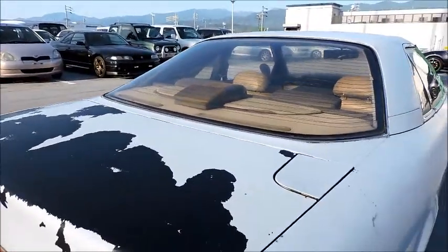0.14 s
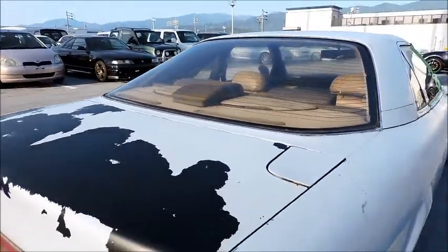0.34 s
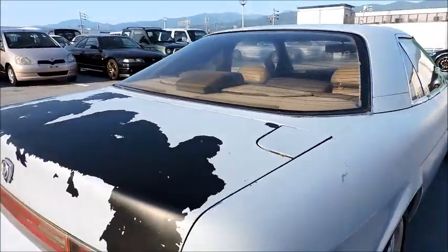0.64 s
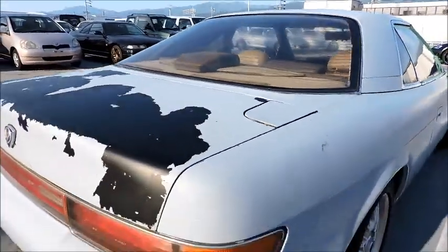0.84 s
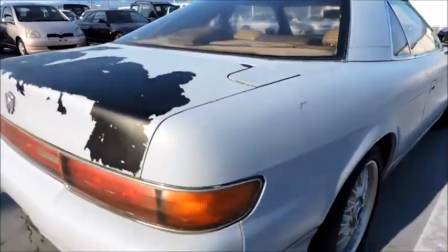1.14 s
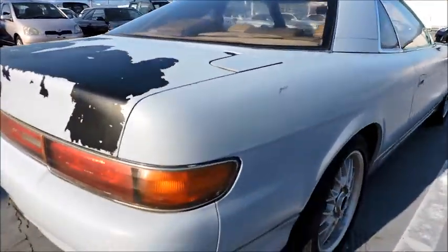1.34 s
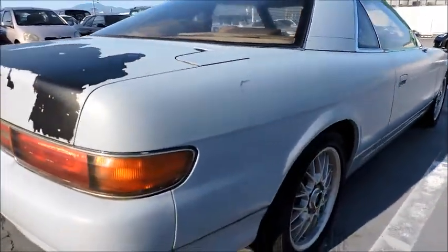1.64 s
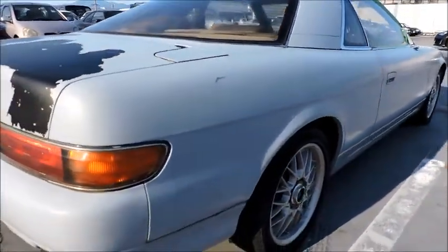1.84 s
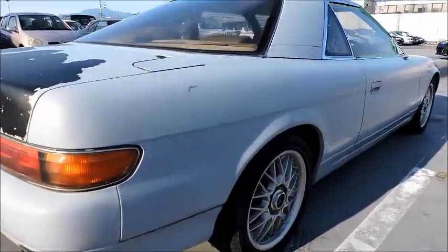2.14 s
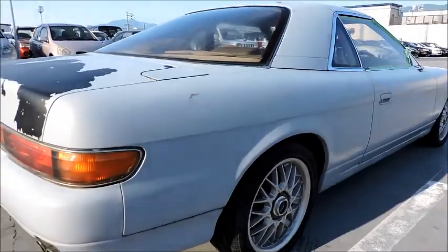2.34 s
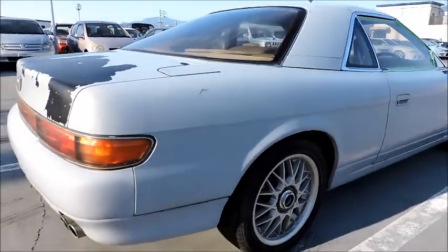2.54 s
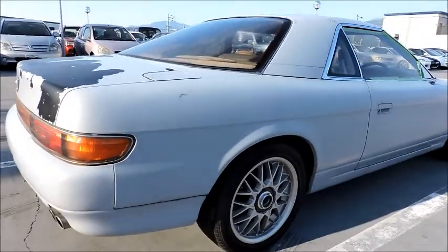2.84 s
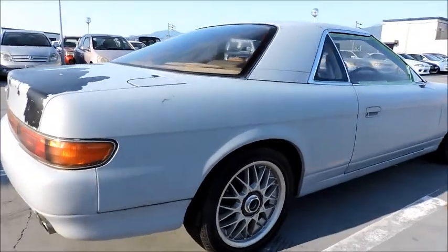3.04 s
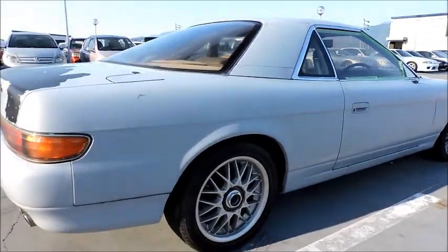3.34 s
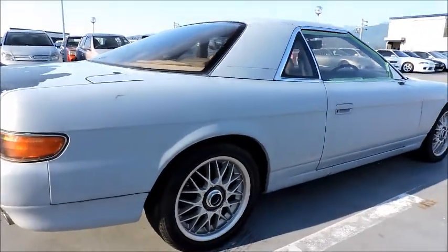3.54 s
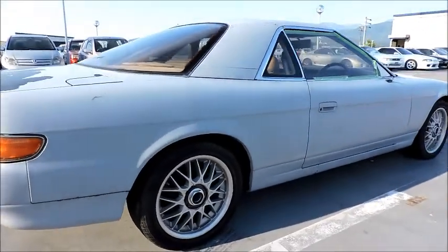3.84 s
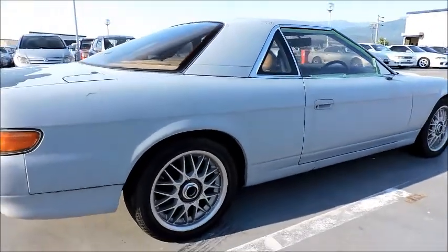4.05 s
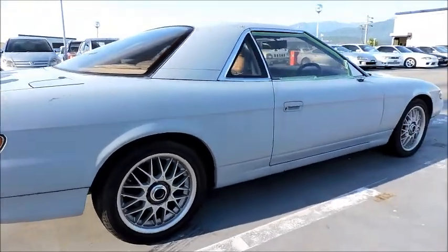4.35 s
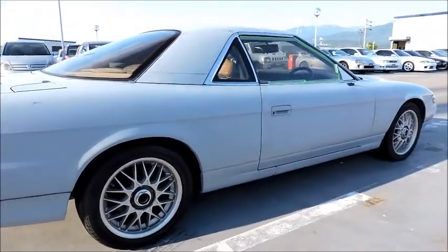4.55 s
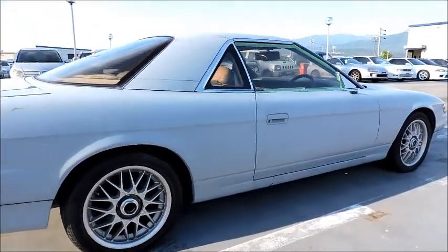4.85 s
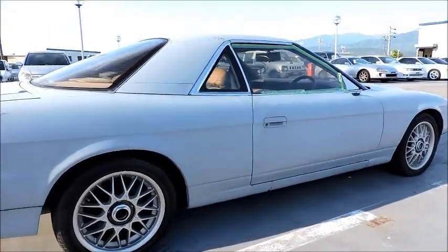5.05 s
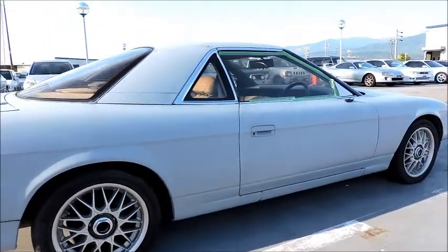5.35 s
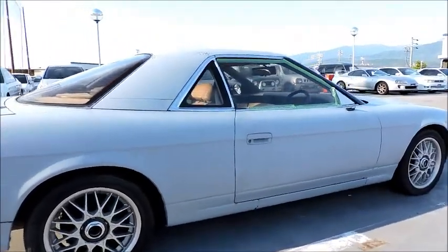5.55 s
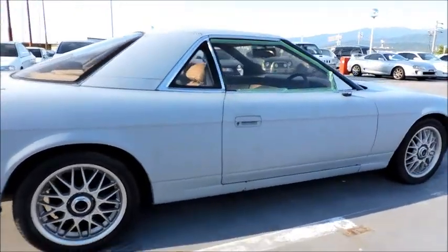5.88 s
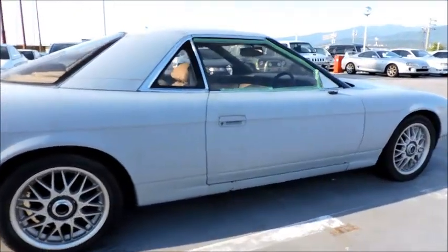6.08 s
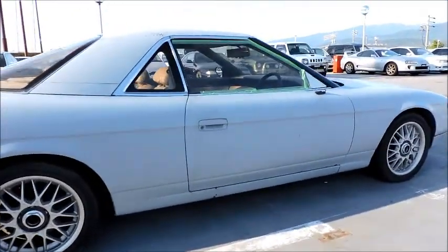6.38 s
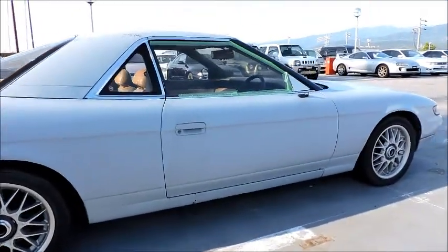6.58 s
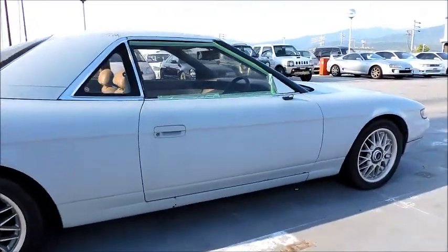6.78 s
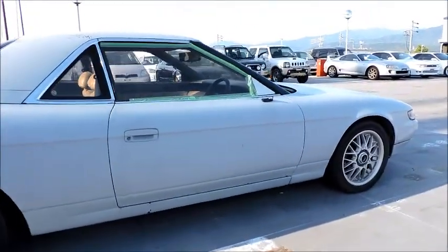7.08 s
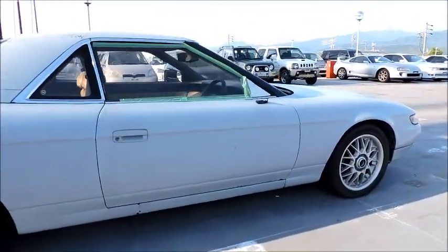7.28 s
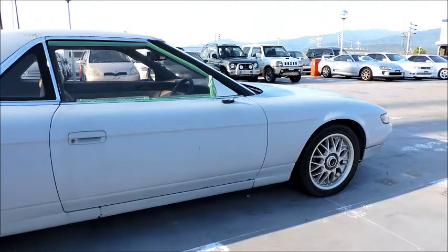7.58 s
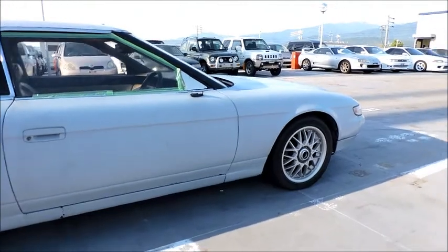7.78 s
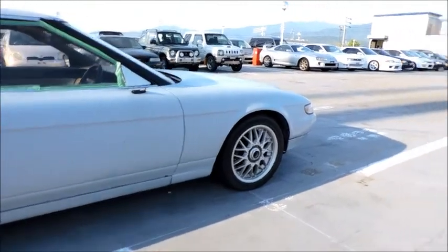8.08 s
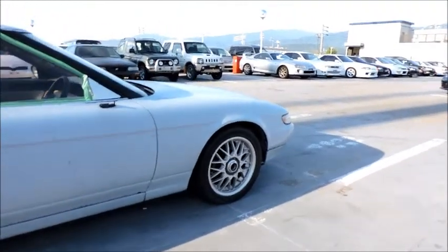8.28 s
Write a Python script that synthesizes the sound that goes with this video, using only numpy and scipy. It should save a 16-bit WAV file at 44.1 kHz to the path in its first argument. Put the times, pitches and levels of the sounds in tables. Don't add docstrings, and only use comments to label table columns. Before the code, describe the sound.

Outdoors in an open car lot, a parked car idles continuously with a deep, fluttering boom, a hollow silencer ring and broad airy roar. A hand-held stereo microphone moves from tail to door, the sound growing less raspy. Wind thumps on the left early, calms in the middle, then returns and slams the right side at the end, overloading and ducking the engine. Faint lens-motor whirrs come and go.

```python
import sys
import numpy as np
from scipy import signal
from scipy.fft import rfft, irfft, next_fast_len
from scipy.io import wavfile
from scipy.ndimage import uniform_filter1d

SR = 44100
rng = np.random.default_rng(int(sys.argv[2]) if len(sys.argv) > 2 else 0)


def waveform_to_disk(signal):
    frames = np.transpose(np.atleast_2d(signal))
    scaled = np.clip(frames, -1, 1) * 32767
    samples = np.round(scaled).astype(np.int16)
    wavfile.write(sys.argv[1], SR, samples)


def linear_from_db(decibels):
    return 10 ** (np.asarray(decibels, float) / 20)


N = 371305
TIME = np.arange(N) / SR
LEFT_DB = -4.5
PORT_GAIN = linear_from_db([[LEFT_DB], [0]])

# (time [s], place [0 tail - 1 door])
PLACE = [
    (0, -0.63),
    (1, -0.048),
    (1.6, 0.49),
    (2.3, 0.69),
    (3, 0.98),
    (4, 1.15),
    (5.5, 1.28),
    (7, 1.27),
    (8.4, 1.2),
]


def evened(x):
    return x / np.sqrt(np.mean(x ** 2) + 1e-20)


def curve(rows, t=TIME):
    s, *columns = np.transpose(rows)
    return np.array([np.interp(t, s, c) for c in columns])


def read(points, hz):
    f, value = np.transpose(points)
    return np.interp(np.log(hz + 1), np.log(f + 1), value)


def coloured(points):
    size = next_fast_len(N)
    gain = linear_from_db(read(points, np.fft.rfftfreq(size, 1 / SR)))
    return evened(irfft(rfft(rng.standard_normal(size)) * gain, size)[:N])


def band(x, hz, width_hz, order=1):
    edges_hz = np.sqrt(hz ** 2 + width_hz ** 2 / 4) + np.array([-width_hz, width_hz]) / 2
    return evened(signal.sosfilt(signal.butter(order, edges_hz, "band", fs=SR, output="sos"), x))


def resonate(x, hz, width_hz, count=1):
    carrier = np.exp(2j * np.pi * np.cumsum(hz) / SR)
    pole = np.exp(-np.pi * width_hz / SR)
    low = x * carrier.conj()
    for _ in range(count):
        low = signal.lfilter([1 - pole], [1, -pole], low + 1e-18)
    return evened((carrier * low).real)


def slow(top_hz):
    step = 32
    lowpass = signal.butter(2, top_hz, fs=SR / step)
    coarse = signal.lfilter(*lowpass, rng.standard_normal(N // step + 2))
    return np.interp(np.arange(N) / step, np.arange(len(coarse)), evened(coarse))


def shaft_turns():
    # (time [s], speed [turns/s])
    speed = [
        (0, 11.731),
        (1, 11.951),
        (1.5, 12.047),
        (2.7, 12.336),
        (3.6, 11.903),
        (4.4, 11.639),
        (5.9, 12.331),
        (7.5, 11.723),
        (8.4, 12.114),
    ]
    return -0.13 + np.cumsum(curve(speed)[0]) / SR


def firing_orders(turns):
    # (multiple of shaft speed, tail level [dB], door level [dB], lag [turns])
    order_lines = [(1.96, -82, -50.5, 0.085), (3.826, -50, -44.5, 0.036), (9.2, -44.5, -57, -0.019),
                   (11.74, -56.5, -48.5, 0.015), (14.99, -47.5, -47, 0.0182), (18.04, -50, -49, -0.0292),
                   (26.16, -67, -50.5, -0.0188)]
    place = curve(PLACE)[0]
    far = np.maximum(place, 0) ** 2
    boom_db, octave_db = -32 - 4 * far, -33 - 3.5 * far
    out = linear_from_db(boom_db + 0.52 * slow(9)) * np.cos(6 * np.pi * (turns - 0.15))
    out += linear_from_db(octave_db + slow(33)) * np.cos(12 * np.pi * turns)
    for multiple, tail_db, door_db, lag_turns in order_lines:
        level_db = tail_db + place * (door_db - tail_db) + 2.0 * slow(4.5)
        out += linear_from_db(level_db) * np.cos(2 * np.pi * round(multiple) * (turns - lag_turns))
    return np.sqrt(2) * out


def silencer_ring(turns):
    # (puff angle [turns], puff length [turns], ring strength [dB])
    rotors = [
        (.3, .28, -11),
        (.5, .3, -12),
        (.67, .58, 0),
    ]
    ring_level = [(.4, -41.5), (1.2, -38.5), (2.1, -33), (3.2, -34.5), (5, -33), (6.7, -34.5), (7.8, -39)]
    ring_order, glide_share, start_turns = 21.7, 0.08, 0.27
    hum_order, hum_db, hum_cycles = 21, -17, 0.06
    since = (turns - start_turns) % 1
    cycles = ring_order * since * (1 + glide_share * (since - 1))
    chance = rng.standard_normal((round(turns[-1]) + 4, len(rotors), 2))
    ring = np.zeros(N)
    for k, (angle_turns, length_turns, db) in enumerate(rotors):
        puffs = turns - angle_turns + 2
        firing = np.floor(puffs)
        strength, slip = chance[firing.astype(int), k].T
        through = np.clip((puffs - firing) / length_turns, 0, 1)
        swell = np.tanh(1.6 * np.sin(np.pi * through ** 0.75)) ** 2
        ring += linear_from_db(db + (3 - k) * strength) * swell * np.sin(2 * np.pi * (cycles + 0.04 * slip))
    ring += linear_from_db(hum_db) * np.sin(2 * np.pi * (hum_order * since + hum_cycles))
    return linear_from_db(curve(ring_level)[0]) * evened(ring)


def exhaust(turns):
    return (firing_orders(turns) + silencer_ring(turns)) * PORT_GAIN


def roar(turns):
    # (frequency [Hz], density [dB/Hz])
    rear_spectrum = [(15, -21), (25, -1), (80, -13.5), (140, -29), (260, -10), (350, -20), (553, -20),
                     (897, -21.5), (1080, -29.5), (1400, -32), (1810, -35.5), (4000, -48.5), (8000, -56.5),
                     (15600, -62)]
    front_spectrum = [(15, -31), (25, -13.5), (64, -4.5), (119, -19), (260, -8.5), (350, -19.5), (805, -20),
                      (1110, -28), (1540, -30.5), (2600, -36), (4270, -46), (8000, -50.5), (15600, -55.5)]
    common_share = [(60, 0.67), (300, 0.93), (700, 0.94), (1400, 0.55), (2500, 0.49), (7000, 0.33),
                    (15000, 0.34)]
    left_lag = [(0, 5), (3, 2.8), (6, 2.85), (8.4, 0.55)]  # (time [s], left port lag [samples])
    size, hop = 1024, 256
    frames, hz = N // hop + 5, np.fft.rfftfreq(size, 1 / SR)
    t = np.arange(frames) * hop / SR
    a, b, c, d, patches = rng.standard_normal((frames, len(hz), 5)).T
    patches_db = evened(uniform_filter1d(uniform_filter1d(patches, 10, 0), 12, 1))

    rear_db = 20 * np.log10(evened(linear_from_db(read(rear_spectrum, hz)))) - 38.5
    front_db = 20 * np.log10(evened(linear_from_db(read(front_spectrum, hz)))) - 39
    field_db = rear_db[:, None] + (front_db - rear_db)[:, None] * curve(PLACE, t) + patches_db

    share = np.clip(read(common_share, hz), 0, 1)[:, None]
    right, own = a + 1j * b, c + 1j * d
    lagged = right * np.exp(-2j * np.pi * hz[:, None] * curve(left_lag, t) / SR)
    left = linear_from_db(LEFT_DB) * (share * lagged + np.sqrt(1 - share ** 2) * own)
    spectra = np.array([left, right]) * linear_from_db(field_db)
    wide = signal.istft(spectra, nperseg=size, noverlap=size - hop)[1][:, :N] / 18
    throb_db = 0.36 * np.cos(6 * np.pi * (turns - 0.12)) + 0.35 * np.cos(2 * np.pi * (turns - 0.85))
    return wide * linear_from_db(throb_db)


def pipe_notes(turns):
    # (frequency [Hz], width [Hz], tail level [dB], door level [dB])
    airy_notes = [(396.7, 51, -52.5, -53), (706.7, 85, -54.5, -58.5), (929, 42, -57, -59),
                  (1333, 74, -62, -64), (2480, 430, -78, -85), (565, 110, -71.5, -59)]
    place = curve(PLACE)[0]
    puff = 0.23 + np.exp(-((3 * (turns - 0.05)) % 1) / 0.15)
    air = rng.standard_normal(N) * puff * linear_from_db(2.7 * slow(32))
    hidden = 1 / (1 + np.exp((0.74 - place) / 0.08))
    out = band(air, 536.3, 64.4, order=2) * linear_from_db(-44.5 - 12.5 * hidden)
    for hz, width_hz, tail_db, door_db in airy_notes:
        level_db = tail_db + place * (door_db - tail_db)
        out += band(air, hz, 0.67 * width_hz, order=2) * linear_from_db(level_db)
    return out * PORT_GAIN


def leak(turns):
    since = (turns - 0.68) % 1
    air = rng.standard_normal((2, N))
    mixed = air + 0.6 * air[::-1]
    hiss = np.array([band(a, 11600, 1100) + 0.49 * band(a, 7900, 700) for a in mixed])
    level_db = -67.5 - 8 * (curve(PLACE)[0] - 1) ** 2 + 2.5 * slow(8)
    return hiss * np.exp(-since / 0.18) * linear_from_db(level_db) * PORT_GAIN


def gusts_of(strong, breeze_db):
    count, over_db, spread_db, width_s = 70, -4, 2, 0.022
    at, size, span = rng.random((count, 3)).T
    peak_db = breeze_db[(at * N).astype(int)] + over_db + spread_db * (2 * size - 1)
    return strong + list(zip(at * N / SR, peak_db, width_s * (0.5 + span)))


def wind():
    # (time [s], left level [dB], right level [dB])
    breeze = [(0, -24, -40), (.6, -30, -40), (.78, -19.5, -37), (1.0, -26.5, -29), (1.7, -33, -27),
              (1.85, -27, -32), (2.2, -45, -27), (2.5, -32, -38), (4.5, -51, -42.5), (5.0, -60, -43),
              (5.8, -50, -47), (6.7, -62, -42), (6.92, -34, -40), (7.05, -56, -29), (7.6, -36, -36.5),
              (7.8, -29.5, -34.5), (8.0, -33, -12), (8.4, -31, -11)]
    # (time [s], peak level [dB], width [s])
    gusts_left = [(0.096, -25, 0.011), (0.192, -26, 0.052), (0.251, -23, 0.029), (0.322, -25.5, 0.0091),
                  (0.464, -25.5, 0.074), (.621, -23.5, 0.0091), (0.686, -28, 0.019), (.766, -29, .017),
                  (0.797, -19, 0.067), (0.906, -20.5, 0.02), (.945, -22.5, 0.017), (0.991, -18, 0.029),
                  (1.108, -26, 0.059), (1.195, -24.5, 0.029), (1.363, -28, 0.025), (1.544, -25.5, 0.037),
                  (1.601, -26.5, 0.017), (1.682, -27.5, 0.034), (1.762, -29, .06), (2.142, -26, 0.054),
                  (3.447, -47, .02), (4.963, -29, 0.036), (5.073, -29.5, 0.11), (6.929, -33, .056),
                  (6.971, -27, 0.022), (7.822, -29.5, 0.061), (7.921, -27, 0.022), (8.003, -26, 0.021)]
    gusts_right = [(.904, -30, .032), (2.06, -28, .071), (2.182, -27, 0.017), (7.02, -21, 0.043),
                   (7.065, -25, 0.033), (7.154, -19.5, 0.021), (7.179, -21, 0.033), (7.245, -21, 0.014),
                   (7.498, -24.5, 0.027), (7.659, -25.5, 0.056), (7.872, -13, 0.017), (7.932, -14, 0.022),
                   (7.975, -11, 0.045), (8, -9, 0.021), (7.005, -18.5, 0.0093), (8.04, -12.5, 0.027),
                   (8.072, -2, 0.0053), (8.096, -3.5, 0.02), (8.123, -12.5, 0.037), (8.152, -13.5, 0.025),
                   (8.197, -5, 0.025), (8.226, -3, 0.037), (8.253, -13, .016), (8.272, -2.5, 0.019),
                   (8.29, -8.5, 0.024), (8.318, 1, 0.018), (8.333, -2.5, 0.0075), (8.369, -5.5, 0.019),
                   (8.4, -5, 0.0074), (8.412, -2.5, 0.062)]
    # (frequency [Hz], level [dB])
    rumble = [(10, 11), (30, -2.5), (80, 5), (150, -6), (300, -22), (600, -44), (2000, -77), (20000, -110)]
    thump = [(15, -25), (50, 0.5), (130, -1.5), (220, -1), (400, -17), (800, -50), (2000, -65),
             (20000, -110)]
    buffet = [(20, -4.5), (80, -1.5), (200, 3), (350, -1.5), (700, -11), (1200, -29.5), (2000, -64.5),
              (3500, -81), (20000, -110)]
    out = []
    for breeze_db, strong in zip(np.minimum(curve(breeze), -24), (gusts_left, gusts_right)):
        power = linear_from_db(breeze_db - 7.0 + 6.7 * np.tanh(slow(30))) ** 2
        eddies = np.zeros(N)
        for s, db, width_s in gusts_of(strong, breeze_db):
            near = slice(max(round((s - 0.1) * SR), 0), round((s + 0.083) * SR))
            away_s = TIME[near] - s
            side_s = np.where(away_s < 0, 0.35, 0.75) * width_s
            power[near] += linear_from_db(db - 2.0) ** 2 * np.exp(-(away_s / side_s) ** 2)
            eddy_hz = 120 * linear_from_db(0.35 * (db + 22))
            fade = np.exp(-1.5 * np.hypot(eddy_hz * away_s, 0.12))
            eddies[near] -= linear_from_db(db + 4.5) * np.cos(2 * np.pi * eddy_hz * away_s) * fade
        force_db = 10 * np.log10(power)
        firm = np.clip((force_db + 32.5) / 14, 0, 1)
        hard = np.clip((force_db + 26.5) / 12, 0, 0.95) ** 2
        dull = np.sqrt(1 - firm) * coloured(rumble) + np.sqrt(firm) * coloured(thump)
        snaps = rng.standard_normal(N) * (rng.random(N) < 280 / SR)
        bright = linear_from_db(3.9 * np.tanh(slow(187))) * coloured(buffet)
        bright += 0.085 * band(snaps, 670, 1180, order=4)
        noise = np.sqrt(1 - hard) * dull + np.sqrt(hard) * bright
        out.append(eddies + np.sqrt(power) * noise)
    return np.array(out)


def mic_hiss():
    hiss_spectrum = [(100, -11), (3000, 10), (9000, -1), (12000, 3.5), (15000, 0), (20000, -15)]  # (frequency [Hz], density [dB/Hz])
    return np.array([coloured(hiss_spectrum), coloured(hiss_spectrum)]) * linear_from_db([[-74], [-71]])


def lens():
    # (start [s], length [s], whistle at rest [Hz], whistle at speed [Hz], level [dB])
    focus_moves = [(.58, .22, 13400, 14000, -76), (1.115, .55, 13700, 15300, -72.5),
                   (2.082, .34, 11300, 13400, -72.5), (2.683, .29, 14000, 15500, -70),
                   (3.76, 0.37, 11000, 12000, -71), (4.38, .39, 13800, 15300, -72),
                   (6.245, .19, 13400, 15500, -71.5), (6.505, 0.05, 13200, 14000, -73),
                   (7.386, 0.35, 12800, 14000, -75), (7.996, 0.24, 12500, 15200, -71),
                   (8.3, .05, 13100, 14000, -72)]
    housing_hz, lift_width_hz, lift_db = 14000, 600, 4
    out = np.zeros((2, N))
    waver_hz = 250 * slow(14)
    for start_s, length_s, rest_hz, top_hz, db in focus_moves:
        first, size = round(start_s * SR), round(length_s * SR)
        speed = np.minimum(1.8 * np.sin(np.pi * np.arange(size) / size), 1)
        hz = rest_hz + (top_hz - rest_hz) * speed + waver_hz[first:][:size]
        whistle_db = db + lift_db * np.exp(-((hz - housing_hz) / lift_width_hz) ** 2)
        rasp_db = db + 2.5 + 3.5 * speed
        noise = rng.standard_normal((2, 3, size))
        for port, (air, grit, rasp) in zip(out, noise + 0.37 * noise[::-1]):
            whistle = linear_from_db(whistle_db) * resonate(air, hz, 520, count=2)
            housing = 0.63 * band(grit, housing_hz, 800) + 0.63 * band(rasp, 12500, 6000)
            move = whistle + linear_from_db(rasp_db) * housing
            port[first:][:size] += move * signal.windows.tukey(size, 0.15)
    return out * PORT_GAIN * linear_from_db(1.5 * slow(40))


def scene():
    turns = shaft_turns()
    engine = exhaust(turns) + roar(turns) + pipe_notes(turns) + leak(turns)
    return engine + wind() + mic_hiss() + lens()


def band_limit(x):
    return signal.sosfilt(signal.butter(12, 15710, fs=SR, output="sos"), x)


def record(dry):
    threshold_db, duck_share, duck_s, recover_db_per_s = -19.5, 0.86, 0.11, 19
    power_db = 10 * np.log10(abs(uniform_filter1d((dry ** 2).max(0), 1200)) + 1e-12)
    fall_db = TIME * recover_db_per_s
    held_db = np.maximum.accumulate(power_db + fall_db) - fall_db
    over_db = np.maximum(held_db - threshold_db, 0)
    pole = np.exp(-1 / (duck_s * SR))
    duck_db = duck_share * signal.lfilter([1 - pole], [1, -pole], over_db)
    return band_limit(np.tanh(dry / linear_from_db(duck_db)))


dry = scene()
out = record(dry)
waveform_to_disk(out)
```